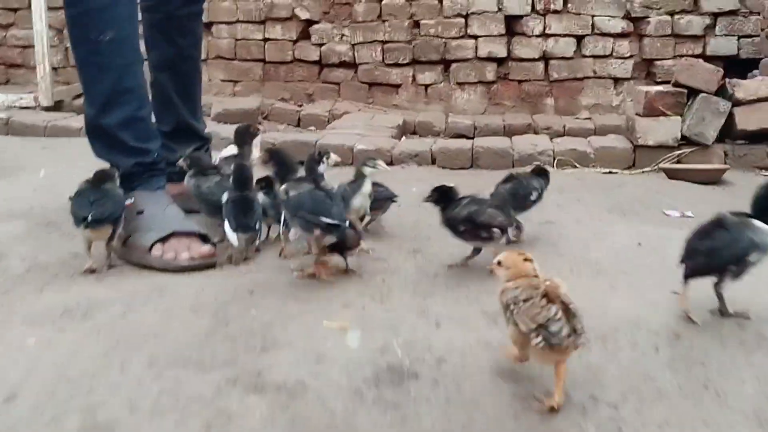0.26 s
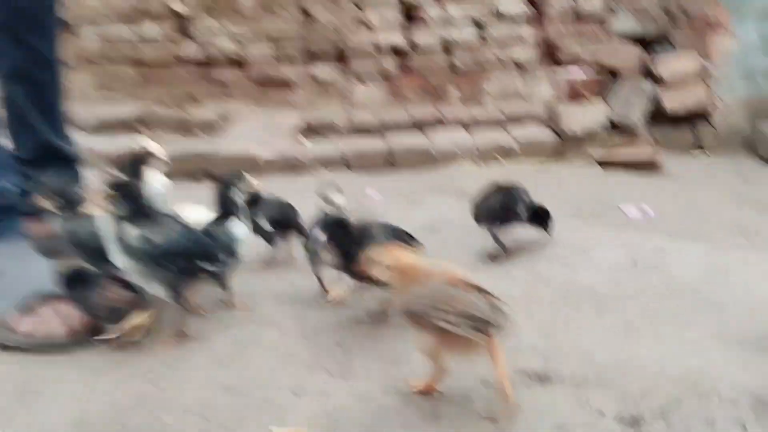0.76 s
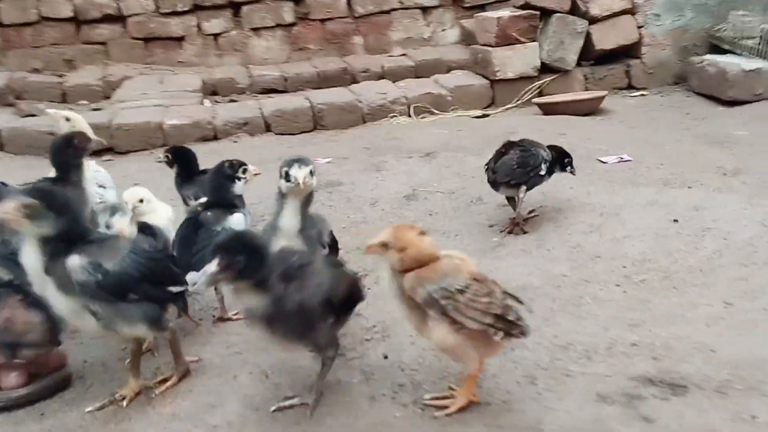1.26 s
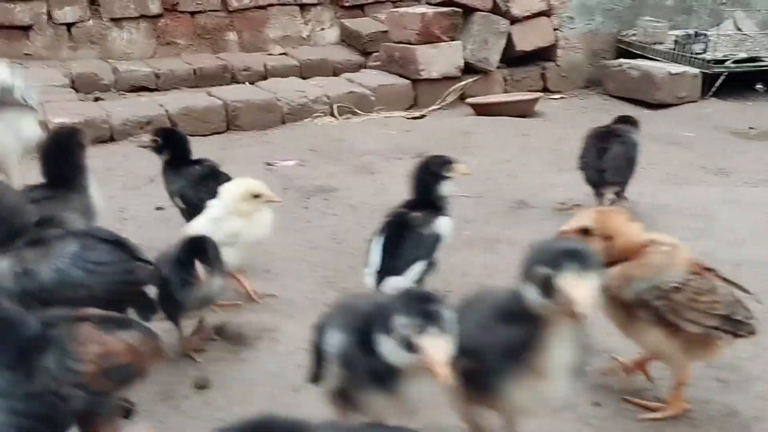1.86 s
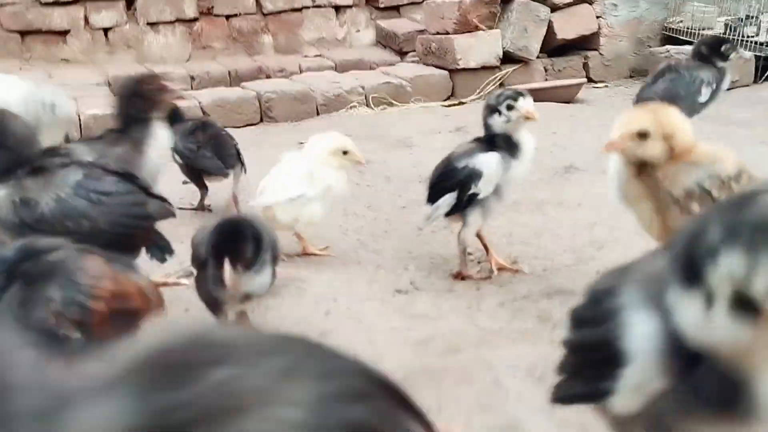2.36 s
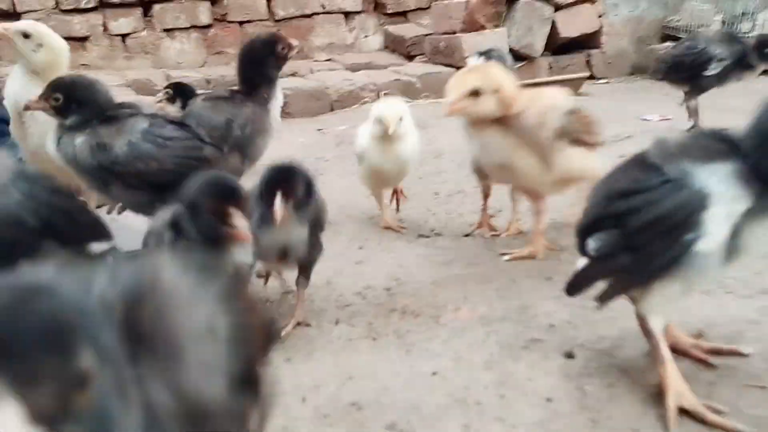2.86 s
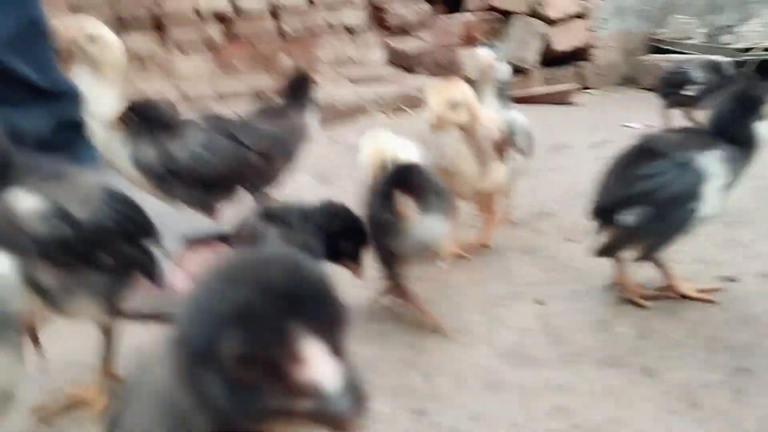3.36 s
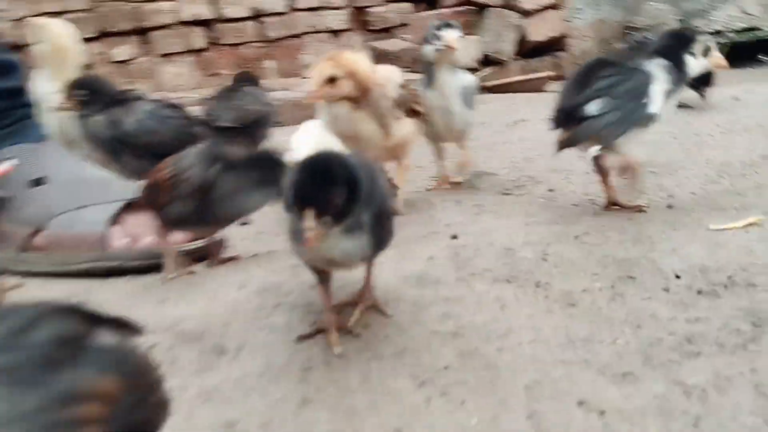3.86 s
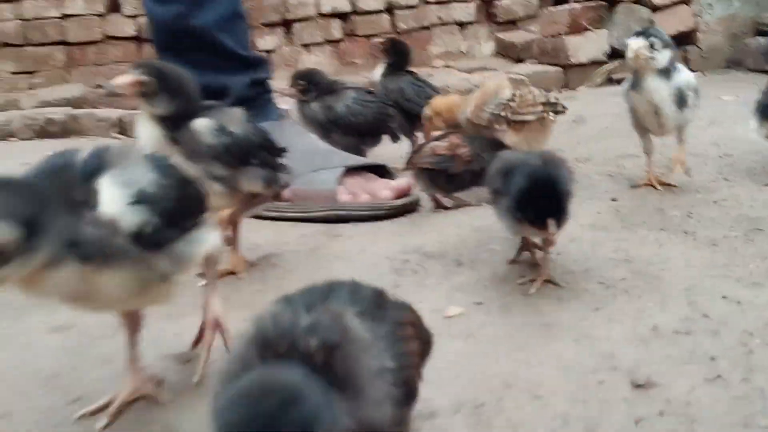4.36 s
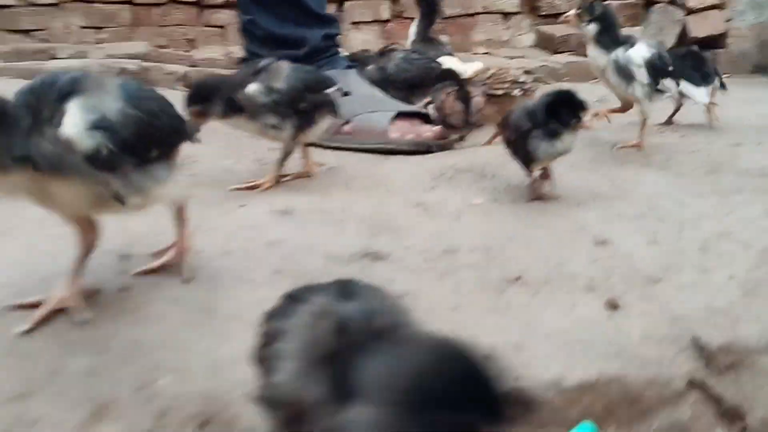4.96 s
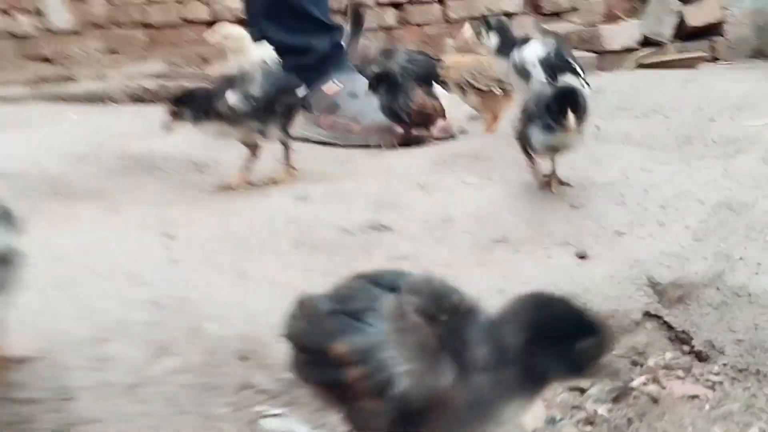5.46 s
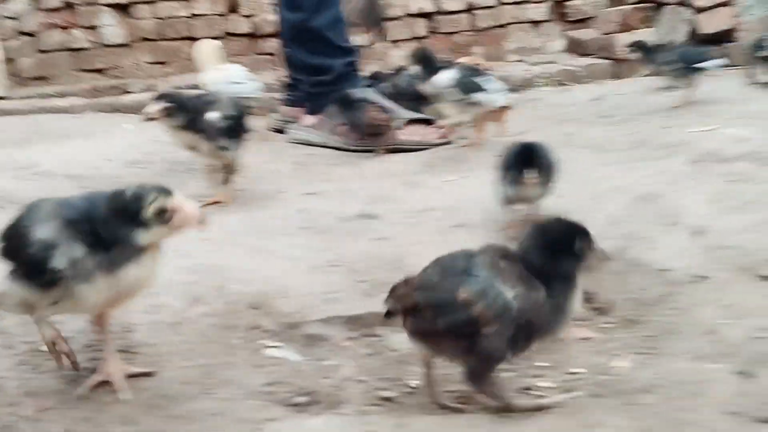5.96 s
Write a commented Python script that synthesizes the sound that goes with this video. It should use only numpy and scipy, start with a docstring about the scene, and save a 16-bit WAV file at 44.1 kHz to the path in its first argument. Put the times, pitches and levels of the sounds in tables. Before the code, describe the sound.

A flock of young chicks peeps without pause in a walled dirt yard, heard close up on a handheld stereo microphone. From 0 to 1.2 seconds, short, high whistled cheeps overlap at moderate level, with one sharper call near 0.8 and light dull taps. Around 1.4 to 1.8 a very faint two-tone horn wavers far away beneath the birds. From about 1.5 the calls crowd together and grow louder, most piercing between 2.4 and 3.3, with tiny sharp chirps and burred, falling peeps, many leaning left. A clearer knock lands near 2.4, and gritty foot scuffs scrape around 2.9 to 3.4 as low wind bumps the microphone. After 3.5 the near calls thin somewhat while fainter peeps continue all around. More scuffs and wind come from 4.2 to 5, and a bright chirp at 5.3. Cheeping continues to the end, around 6.2, with short wall echoes and soft town rumble.

```python
"""A flock of chicks peeps in a walled dirt yard, close to a handheld pair of microphones.
Each peep is a near-pure whistle with faint overtones that holds or arches, then drops; some hook up or burr.
Feet scuff (swarms of grit clicks) and tap (damped knocks); sparse wall echoes follow both birds and feet.
A distant two-tone horn sounds briefly as wavering harmonics; light wind and town rumble, both shaped
noise, lie underneath."""
import sys
import numpy as np
from scipy import signal
from scipy.fft import rfft, irfft
from scipy.io import wavfile
from scipy.ndimage import uniform_filter1d

SR = 44100
rng = np.random.default_rng(int(sys.argv[2]) if len(sys.argv) > 2 else 0)


def wrap_up_sound(samples):
    """Save the sound to the file named by the first command line argument, as 16-bit audio."""
    columns = np.atleast_2d(samples).T
    # keep every value between -1 and 1, then stretch to whole-number steps
    tamed = np.clip(columns, -1, 1)
    steps = np.round(tamed * 32767).astype(np.int16)
    wavfile.write(sys.argv[1], SR, steps)


N = 273420


def chicks():
    """Near peeps, and fainter ones from all sides: the same kinds of call, rescaled in pitch and length."""
    # Each row: start in seconds, length in seconds, opening pitch in Hz, sag in Hz per second,
    # closing drop in Hz, nominal level in dB, left-right difference in dB.
    near_calls = [(0.0, 0.12, 4700, 605.5, 1700, -38.5, 2), (0.025, 0.17, 4420, 3506.5, 1275, -34.5, -0.5),
                  (0.237, 0.23, 4267, 605, 1517, -32.5, 1.5), (0.445, 0.14, 3750, 2789, 713, -36, 0),
                  (0.456, 0.18, 5000, 4000, 1657, -35, 3), (0.596, 0.04, 4210, 19988, 657, -39, -2),
                  (0.629, 0.14, 4660, -2600, 548, -39.5, 3), (0.772, 0.17, 4557, 3302, 1556, -24.5, 2),
                  (0.934, 0.086, 3725, 3590, 847, -33, 7), (1.044, 0.037, 4520, 28001.5, 482, -33, -6),
                  (1.051, 0.14, 4225, 1808, 1042, -35.5, -2.5), (1.153, 0.14, 4410, 4009, 1696, -34.5, 3.5),
                  (1.032, 0.2, 5456, 7501, 1580, -34.5, 8), (1.276, 0.2, 4210, 1494, 1386, -27.5, -2),
                  (1.421, 0.094, 4940, 4799, 503, -37.5, 10), (1.433, 0.2, 6100, 4000, 1505, -36, 11.5),
                  (1.534, 0.107, 4910, -500, 808, -27.5, -2), (1.539, 0.036, 4010, 20193.5, 723, -24, 8),
                  (1.589, 0.11, 5370, -2200, 3400, -38, 23), (1.643, 0.075, 3586, 4991, 1038, -26, 3.5),
                  (1.745, 0.12, 3900, 7088, 352, -30, -9.5), (1.748, 0.14, 4844, 4596.5, 963, -28, 1),
                  (1.932, 0.17, 4900, 2999, 2272, -26.5, 9), (2.022, 0.18, 4990, -2100, 1513, -28.5, 5.5),
                  (2.056, 0.1, 4245, 7008.5, 868, -31.5, 3.5),
                  (2.214, 0.17, 4620, 3495.5, 1080, -27.5, 0.5),
                  (2.275, 0.12, 4970, 3997.5, 2482, -25.5, 11.5), (2.295, 0.053, 3930, 9795, 590, -28, 4.5),
                  (2.393, 0.089, 4780, 3107, 2110, -26.5, 8), (2.468, 0.11, 4460, 1194, 406, -23.5, 0.5),
                  (2.51, 0.072, 3960, 5999.5, 763, -31, -18.5), (2.571, 0.17, 4537, 4506.5, 1793, -27, 9),
                  (2.579, 0.035, 4195, 24918, 876, -17.5, -2), (2.588, 0.19, 5070, -4000, 1920, -31.5, 1),
                  (2.641, 0.11, 4900, 4605, 1133, -23.5, 5), (2.657, 0.07, 4710, 14001.5, 670, -27, -5),
                  (2.762, 0.093, 4800, 6699.5, 1783, -28, 7), (2.906, 0.076, 5040, 4692.5, 2045, -23, 4.5),
                  (2.961, 0.18, 4900, 2798.5, 2150, -22.5, 11),
                  (3.095, 0.14, 4870, -3000, 1723, -28.5, 4.5), (3.121, 0.15, 4420, 3502.5, 1410, -34.5, 5),
                  (3.2, 0.033, 3950, 22008.5, 680, -17, 0), (3.37, 0.23, 5070, 2711, 2057, -30, 5),
                  (3.393, 0.1, 4800, 12995.5, 640, -31, 5), (3.522, 0.054, 5135, 3002, 1096, -34, 31),
                  (3.577, 0.039, 3730, 10000, 810, -21.5, 7), (3.642, 0.13, 4835, 1, 2146, -29.5, 9),
                  (3.669, 0.16, 5235, -400, 1604, -27.5, 6.5), (3.903, 0.18, 5007, 1988, 2310, -31, 8.5),
                  (3.966, 0.087, 5195, 4006, 935, -36.5, 27), (4.062, 0.034, 3830, 17994, 854, -25.5, 9.5),
                  (4.143, 0.084, 5170, 2985, 2310, -29, 5.5), (4.309, 0.12, 3723, 1691.5, 1455, -36, -1.5),
                  (4.5, 0.21, 5130, 3296, 2284, -31.5, 2.5), (4.516, 0.059, 3475, 11401, 227.5, -37.5, -2),
                  (4.584, 0.097, 5096, 6005, 1070, -32.5, 11), (4.754, 0.071, 5390, 1510, 3095, -32.5, 5),
                  (4.838, 0.21, 4824, 3581.5, 850, -37, 0), (4.947, 0.15, 3664, 1195, 1075, -39, -1),
                  (5.031, 0.175, 4850, -5500, 2680, -41, -1), (5.178, 0.15, 5250, 5196, 408, -36, -3.5),
                  (5.319, 0.043, 3867, 12716.5, 633, -22, 6), (5.513, 0.079, 3875, 3008, 920, -37.5, 4),
                  (5.54, 0.19, 5314, -1500, 2080, -33.5, -1.5), (5.573, 0.21, 4840, 5002, 1303, -39, 2),
                  (5.769, 0.12, 5830, -1500, 3270, -42, -3), (5.956, 0.19, 5360, 6993.5, 1410, -34.5, 2.5),
                  (6.077, 0.13, 5430, -2600, 100, -29, 1)]
    # Starts in seconds of the near peeps that hook up from far below.
    hooked_starts_s = [1.036, 2.214, 3.394, 3.521, 3.668, 3.973, 4.141, 4.578, 5.952]
    # Starts in seconds of the near peeps with a burr, besides the hooked ones.
    burred_starts_s = [0.773, 1.584, 2.033, 2.393, 2.572, 2.755, 2.903, 3.097, 3.905, 4.503, 4.749]
    scoop_hz, hook_hz = 400, 1600  # slide up into held notes; into hooked ones
    far_count, far_top_db, far_range_db = 360, -27, 13  # top is added to half the near level

    def listed(start_s, starts_s):
        return np.abs(np.subtract(starts_s, start_s)).min() < .006

    near, far = np.zeros((2, 2, N))
    for start_s, *call in near_calls:
        hooked = listed(start_s, hooked_starts_s)
        burred = listed(start_s, hooked_starts_s + burred_starts_s)
        held = call[0] > .1
        add(near, start_s, peep(*call, hook_hz if hooked else scoop_hz * held, burred))

    chances = rng.random((far_count, 6))
    for k, (like, late, size, faint, side, arch) in enumerate(chances):
        heard = near_calls[k % len(near_calls)]  # sets time and level
        model = near_calls[int(like * len(near_calls))]  # sets the shape
        level_db = heard[5] / 2 + far_top_db - far_range_db * faint
        pitches = np.multiply(model[2:5], .85 + 0.26 * size)
        call = peep(0.7 * model[1], *pitches, level_db, 12 * side - 4, hook_hz * arch ** 2, arch > .5)
        start_s = max(heard[0] + heard[1] * late - .05, 0)
        add(far, start_s, call)
    return near, far


def peep(length_s, open_hz, sag_hz_per_s, drop_hz, level_db, pan_db, scoop_hz=0, burred=False):
    """A gliding whistle with faint overtones; it reaches one port a little before the other."""
    # Each row: frequency in Hz, overtone level against the whistle in dB.
    overtone_levels = [(6500, -7.5), (8600, -28), (9800, -50.5), (11200, -39.5), (14500, -44.5)]
    # Each row: side tone offset in burr steps from the whistle, level in dB.
    burr_tones = [(-1, -18), (1, -11)]
    scoop_s, drop_s, swell_s, fade_s = .009, .019, .023, .007
    swell_db, sink_db = -2.5, -7.5  # the voice swells in, and sinks as the pitch drops
    break_hz, break_width_hz, break_jump_hz = 3650, 200, 260
    throat_hz, throat_db = 3284, 2  # the throat rings loudest just under the break
    lag_s = 0.000063  # largest lag between ports

    t = np.arange(0, length_s + .005, 1 / SR)
    ports = np.array([[.5], [-.5]])

    closing = np.exp((t - length_s) / drop_s)  # the drop quickens toward the end
    pitch_hz = open_hz - sag_hz_per_s * t - drop_hz * closing
    pitch_hz -= scoop_hz * np.exp(-t / scoop_s)
    # a falling voice jumps down at the break, then lingers
    near_break = np.exp(-.5 * ((pitch_hz - break_hz) / break_width_hz) ** 2)
    pitch_hz -= (open_hz > 4000) * break_jump_hz * near_break
    pitch_hz = np.maximum(pitch_hz, 2100)  # floor before the shake

    effort_db = level_db + swell_db * np.exp(-t / swell_s) + sink_db * closing ** 3
    effort_db += throat_db * np.exp(-.5 * ((pitch_hz - throat_hz) / break_width_hz) ** 2)
    effort_db += 2.2 * drift(len(t), 300)  # unsteady air flow
    pitch_hz *= 1 + .003 * drift(len(t), 400)  # pitch shake

    side, step = rng.random(2)
    lag = np.copysign(.5 + abs(side - .5), side - .5)  # half to full lag, either port first
    turns = np.cumsum(pitch_hz) / SR - ports * pitch_hz * lag * lag_s
    tone = np.sin(2 * np.pi * turns)
    for k in (2, 3):
        tone += amp(read(overtone_levels, k * pitch_hz)) * np.sin(2 * np.pi * k * turns)

    if burred:  # a second, slow vibration beats against the high part of the whistle
        high = np.clip((pitch_hz - 4000) / 400, 0, 1)
        slow_turns = np.interp(step, (0, 1), (380, 540)) * t  # rate in Hz
        tone += high * sum(amp(db) * np.sin(2 * np.pi * (turns + k * slow_turns)) for k, db in burr_tones)

    to_edge_s = np.minimum(t, t[-1] - t)
    fade = np.sin(np.pi / 2 * np.minimum(to_edge_s / fade_s, 1)) ** 2
    return np.sqrt(2) * tone * amp(effort_db + pan_db * ports) * fade


def feet():
    """Scuffs are swarms of grit clicks of uneven size; taps, of feet and beaks, are short dull knocks."""
    # Feet scraping the dirt. Each row: start in seconds, length in seconds, nominal level in dB.
    scuffs = [(1.861, 0.2, -44.5), (2.253, 0.12, -43), (2.847, 0.19, -38), (2.974, 0.18, -33.5),
              (3.251, 0.2, -35), (4.201, 0.21, -38.5), (4.714, 0.2, -40.5), (4.887, 0.1, -41.5)]
    # Spectrum of the grit. Each row: frequency in Hz, relative density in dB per Hz.
    grit_spectrum = [(200, -5.5), (1700, -3), (7500, -11.5), (9500, -31)]
    # Each row: start in seconds, nominal peak level in dB.
    knocks = [(0.241, -35), (0.574, -43), (0.938, -44), (1.563, -39), (2.446, -30.5), (4.394, -38.5),
              (4.925, -39), (5.907, -43)]

    size_db = 8.2 * rng.exponential(1, N).clip(0, 2.5)
    struck = rng.random(N) < .12
    grains = evened(amp(size_db) * rng.standard_normal(N) * struck)
    grit = evened(coloured(grains + 0.96 * rng.standard_normal((2, N)), grit_spectrum))
    stroke = np.zeros((1, N))
    for start_s, length_s, level_db in scuffs:
        add(stroke, start_s, amp(level_db) * signal.windows.tukey(round(length_s * SR), 1)[None])

    out, t = np.zeros((2, N)), np.arange(900) / SR
    for start_s, level_db in knocks:
        ring = np.zeros((2, len(t)))
        for mode_hz in (520, 950, 1600):
            detune = rng.uniform(0.65, 1.188, (2, 1))
            ring += np.sin(2 * np.pi * mode_hz * detune * t)
        decay = amp(level_db - 60 * t / 0.022)  # 60 dB in 22 ms
        add(out, start_s, decay * (1.5 * ring + .35 * rng.standard_normal((2, len(t)))))
    return out + stroke * grit


def horn():
    """Buzzy notes from far off; the air on the way makes each overtone waver and flicker."""
    # Each row: pitch in Hz, start in seconds, end in seconds, nominal level of each harmonic in dB.
    notes = [(330, 1.45, 1.62, -59), (433, 1.4, 1.8, -61)]
    out = np.zeros((2, N))
    for pitch_hz, start_s, end_s, level_db in notes:
        t = np.arange(0, end_s - start_s, 1 / SR)
        turns = np.cumsum(pitch_hz * (1 + .004 * drift(len(t), 3000))) / SR
        note = np.zeros((2, len(t)))
        for k in range(1, 7):
            flicker = amp(4.5 * drift(len(t), 900))
            note += flicker * np.sin(2 * np.pi * (k * turns + rng.random((2, 1))))
        add(out, start_s, amp(level_db) * note * signal.windows.tukey(len(t), .4))
    return out


def yard(x):
    """Sparse echoes of random sign from ground and brick walls, decaying 60 dB in 0.16 s."""
    size = 8000
    signs = rng.choice([-1., 1.], (2, size))
    present = rng.random((2, size)) < .05
    echoes = signs * present * amp(-60 * np.arange(size) / SR / 0.16)
    return signal.fftconvolve(x, echoes / np.linalg.norm(echoes[0]), axes=1)[:, :N]


def air():
    """Town rumble and hiss in drifting patches, and wind that partly differs at each port."""
    # Spectrum of rumble and hiss. Each row: frequency in Hz, relative density in dB per Hz.
    wash_spectrum = [(20, 1), (140, -3.5), (450, -18.5), (1500, -30), (6000, -31), (9500, -56)]
    # Each row: frequency in Hz, left-right likeness from 0 to 1.
    likeness = [(30, 0.076), (200, 1), (800, 0.44), (3000, 0.71)]
    # Gusts on the ports. Each row: time in seconds, nominal level in dB.
    gust_levels = [(0, -64), (3.102, -34), (3.7, -44.5), (4.5, -35), (6.2, -50)]
    # Spectrum of the gusts. Each row: frequency in Hz, relative density in dB per Hz.
    gust_spectrum = [(25, 1.5), (58, 5), (140, -4.5), (300, -52.5)]
    wash_db = -41.5  # nominal, before the left-right tilt

    a, b, c, d, patches = rng.standard_normal((N // 256 + 5, 513, 5)).T
    hz = np.fft.rfftfreq(1024, 1 / SR)
    patches = evened(uniform_filter1d(uniform_filter1d(patches, 10, 0), 12, 1))
    same = np.clip(read(likeness, hz), -1, 1)[:, None]
    left = a + 1j * b
    right = same * left + np.sqrt(1 - same ** 2) * (c + 1j * d)
    spectra = np.array([left, right]) * amp(read(wash_spectrum, hz)[:, None] + 2.24 * patches)
    wash = amp(wash_db) * evened(signal.istft(spectra, nperseg=1024, noverlap=768)[1][:, :N])

    noise = rng.standard_normal((3, N))
    gusts = evened(coloured(noise[:2] + 1.26 * noise[2], gust_spectrum))  # third noise is shared
    return wash + gusts * amp(np.interp(np.arange(N) / SR, *np.transpose(gust_levels)))


def drift(size, hold):
    """Slow chance of rms 1 that holds for about this many samples."""
    return evened(uniform_filter1d(uniform_filter1d(rng.standard_normal(size), hold), hold))


def coloured(x, points):
    """Shapes the spectrum of x by (Hz, dB) points."""
    return irfft(rfft(x) * amp(read(points, np.fft.rfftfreq(N, 1 / SR))), N)


def read(points, hz):
    """Interpolates (Hz, value) points over log frequency."""
    f, value = np.transpose(points)
    return np.interp(np.log(hz + 1), np.log(f + 1), value)


def evened(x):
    """Scales x to rms 1."""
    return x / np.sqrt(np.mean(x ** 2) + 1e-20)


def amp(db):
    """Amplitude factor of a level in dB."""
    return 10 ** (np.asarray(db) / 20)


def add(mix, start_s, sound):
    """Adds sound into mix from start_s, cut at the end of mix."""
    part = mix[:, round(start_s * SR):][:, :sound.shape[1]]
    part += sound[:, :part.shape[1]]


def scene():
    """Direct sound and yard echoes of birds and feet, over horn and air; the air leans right."""
    near, far = chicks()
    near = near + feet()
    echoes = yard(amp(-16) * near + amp(-3.0) * far)
    return near + amp(1.5) * far + echoes + horn() + air() * amp([[-.7], [.7]])


def record(dry):
    """Band limit of the recorder: a linear-phase low-pass."""
    edge_hz = 15900
    lowpass = signal.firwin(511, edge_hz, window=("kaiser", 9), fs=SR)
    return signal.oaconvolve(dry, lowpass[None], "same")


dry = scene()
out = record(dry)
wrap_up_sound(out)
```